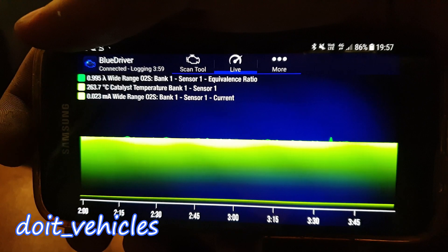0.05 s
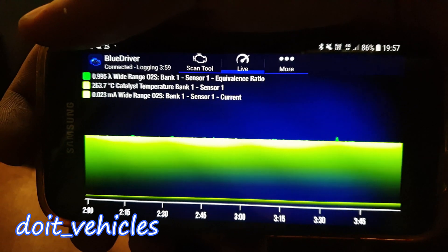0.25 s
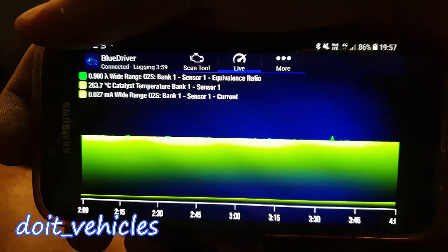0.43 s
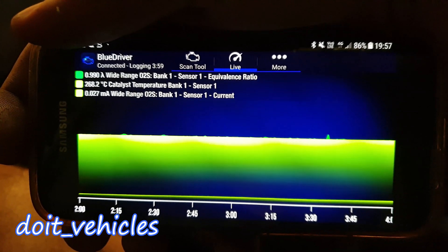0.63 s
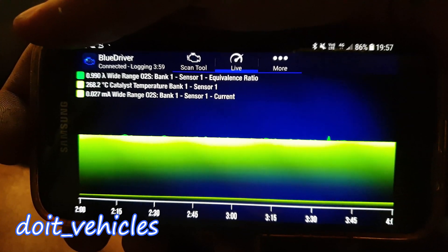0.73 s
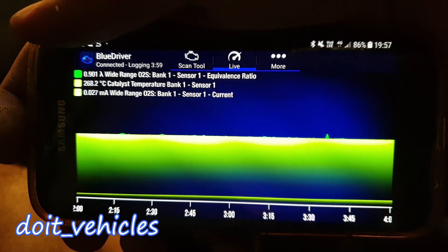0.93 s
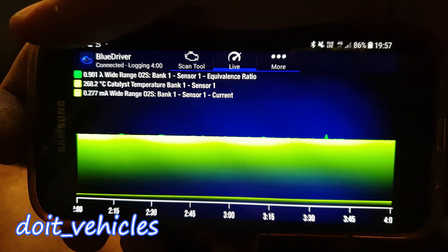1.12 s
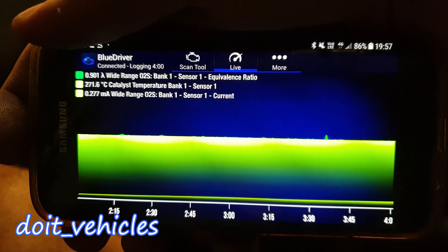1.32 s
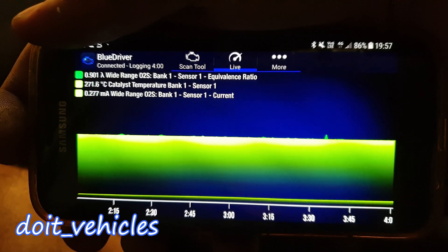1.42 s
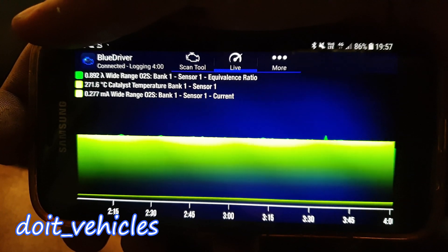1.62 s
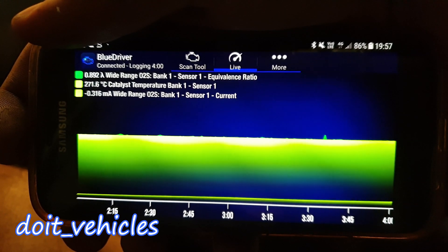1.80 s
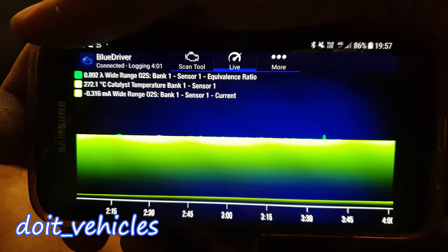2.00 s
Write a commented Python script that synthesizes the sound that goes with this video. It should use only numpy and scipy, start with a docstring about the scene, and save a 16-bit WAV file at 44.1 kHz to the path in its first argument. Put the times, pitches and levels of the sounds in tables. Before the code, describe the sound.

A four-cylinder car engine heard inside the closed cabin: a dry click and pedal scuff, a quick rev upward, a soft pedal knock, then a smooth fall to quiet idle, on a close mono microphone.

```python
"""We hear a four-cylinder engine from the driver's seat of a closed car: a blip of the accelerator
sweeps the firing tone up, then it sinks back to idle. Sines at multiples of the firing rate make the tone.
Around the microphone, resonant and coloured noise makes a muffled mechanical roar that follows the speed.
A dry splice click comes first; the pedal scuffs when pressed and knocks when let go,
from clicks ringing its modes and short bursts of noise."""
import sys
import numpy as np
from scipy import signal
from scipy.fft import rfft, irfft
from scipy.io import wavfile

SR = 44100
rng = np.random.default_rng(int(sys.argv[2]) if len(sys.argv) > 2 else 0)


def unload_wav(signal):
    """Save mono or channel-first audio to the path in sys.argv[1] as 16-bit WAV at rate SR, clipped to [-1, 1]."""
    wavfile.write(
        sys.argv[1],
        SR,
        np.round(np.clip(np.atleast_2d(signal).T, -1, 1) * 32767).astype(np.int16),
    )


N = 90449  # samples, about 2.05 s

# Engine speed and firing tone: (time [s], firing rate [Hz], level of the tone [dB],
# of its 2nd multiple [dB], of its 3rd [dB], of its 4th [dB])
ENGINE_SPEED = [(0.03, 43.55, -34.5, -42.5, -59, -52.5), (0.07, 46.3, -36, -41, -45, -46),
                (0.1, 49.6, -29.5, -42, -42, -71.5), (0.12, 50.4, -19, -39.5, -42, -46.5),
                (0.15, 55.9, -22, -34.5, -30, -45), (0.2, 61.9, -19, -42, -50, -49.5),
                (0.24, 69.75, -31, -30.5, -39.5, -57.5), (0.29, 76, -37.5, -45.5, -39.5, -52.5),
                (0.32, 80.8, -30, -38.5, -44, -63), (0.37, 86.23, -28.5, -39, -50, -45),
                (0.41, 90.9, -28, -46.5, -66.5, -55.5), (0.43, 90.5, -26, -41, -52, -69),
                (0.46, 93.2, -25, -54.5, -56.5, -51.5), (0.52, 96.54, -26, -46, -58, -64.5),
                (0.61, 94.87, -28.5, -51.5, -56, -63), (0.66, 94.4, -26.5, -47.5, -65.5, -55),
                (0.72, 94.4, -27, -53, -60, -64.5), (0.76, 93.3, -28, -56.5, -53.5, -75),
                (0.79, 92.7, -26.5, -50, -60, -45), (0.82, 92.4, -29.5, -45.5, -65, -80),
                (0.87, 89.8, -43, -45.5, -73, -63.5), (0.92, 87.24, -30, -48.5, -66.5, -69),
                (1.0, 83.7, -25.5, -35, -58, -67), (1.04, 83.6, -26.5, -31.5, -62.5, -50),
                (1.14, 80.75, -33, -41, -50, -58.5), (1.2, 78.05, -34, -38, -55.5, -69),
                (1.3, 72.9, -35.5, -50, -67, -69), (1.36, 68.45, -42, -43, -56, -76),
                (1.45, 64.8, -31.5, -63, -68, -70.5), (1.52, 60.75, -39, -40.5, -58, -68),
                (1.57, 58.1, -28.5, -54.5, -55, -74.5), (1.64, 54.32, -30.5, -56, -51.5, -61),
                (1.68, 52.47, -40, -54.5, -72, -78), (1.79, 45.48, -44, -54, -50, -56.5),
                (1.82, 44.26, -36, -43, -82, -65), (1.85, 43.55, -40, -63, -48, -50.5),
                (1.93, 43.42, -56.5, -49.5, -56, -55), (1.99, 42.87, -34, -39.5, -51, -62),
                (2.03, 42.72, -37, -40, -70, -69), (2.04, 42.86, -36, -34, -43, -64)]
WAVER_DB, WAVER_HZ = 0.8, 14  # spread and rate of the level wander

# Unevenness of the cylinders: (multiple of the firing rate [1], level against the roar's mids [dB])
UNEVEN_FIRING = [(.5, -0.5), (1.5, -6), (2.5, -19), (3.5, -15.5)]
UNEVEN_WAVER_DB, UNEVEN_WAVER_HZ = 3.5, 11

# Roar before pulsing: (time [s], level of the cabin boom [dB], of the mids [dB], of the upper mids [dB],
# of the presence band [dB], of the treble hiss [dB])
ROAR_LEVELS = [(0.02, -56, -66.5, -61, -74, -83.5), (0.04, -51, -47.5, -62.5, -72.5, -78.5),
               (0.16, -53, -45.5, -64.5, -82, -83.5), (0.24, -41.5, -48, -59.5, -79.5, -78),
               (0.31, -27, -45, -60, -72, -78), (0.39, -38.5, -47, -59, -69, -79),
               (0.46, -37, -46, -59, -70.5, -79.5), (0.56, -56, -47, -56, -69, -82.5),
               (0.72, -53, -46, -57.5, -69.5, -81.5), (0.88, -50.5, -48.5, -57.5, -69, -82),
               (1.04, -46.5, -48.5, -59, -73, -82), (1.25, -44, -51, -61, -74.5, -83.5),
               (1.43, -47.5, -53, -64, -77.5, -82.5), (1.59, -49.5, -54.5, -67.5, -82, -84.5),
               (1.7, -52.5, -55, -70.5, -84.5, -85), (1.81, -50.5, -55.5, -75, -90, -84.5),
               (1.92, -49, -54, -71.5, -87.5, -86), (2.02, -55, -54.5, -71, -92, -84.5)]
BOOM_HZ, BOOM_WIDTH_HZ = 57.8, 17
SECOND_BOOM_HZ, SECOND_BOOM_WIDTH_HZ, SECOND_BOOM_DB = 163.8, 31, -9  # dB against the first boom
MIDS_PULSE, CLATTER_PULSE = 0.25, 0.07  # depth of the pulsing with each firing, as a fraction
HISS_WAVER_DB, HISS_WAVER_HZ = 1.0, 8

# Noise shapes of the roar, low to high: (frequency [Hz], relative density [dB per Hz])
MIDS_SPECTRUM = [(21, -33.5), (36, -13.5), (49, -22.5), (70, -17), (113, -19), (169, -22), (232, -20),
                 (333, -19), (472, -20), (527, -16.5), (589, -20), (1000, -36), (1300, -68.5), (2200, -120)]
UPPER_SPECTRUM = [(530, -4.5), (900, -4.5), (959, -14.5), (1180, 1.5), (1250, -5), (1370, -3), (1870, -8),
                  (2100, -19), (2730, -42.5), (4620, -120)]
PRESENCE_SPECTRUM = [(1700, -34), (2100, 2.5), (2500, 3.5), (3000, -0.5), (3600, -6.5), (4500, -12),
                     (5200, -23), (6500, -42)]
HISS_SPECTRUM = [(3500, -21.5), (4800, -9), (5500, -6), (7000, -3), (9900, -7), (10500, -14), (13000, -18),
                 (16000, -16.5)]

# Trim panels singing faintly in the clatter:
# (frequency [Hz], level against the upper mids [dB], time to fall 60 dB [s])
TRIM_PANELS = [(993, -14, 0.3), (1068, -8, 0.11), (1152, -11.5, 0.13), (1329, -11.5, 0.046),
               (1540, -18.5, 0.087), (1570, -20, 0.11), (2136, -24.5, 0.097), (2316, -24, 0.13)]

SPLICE_S, SPLICE_DB, SPLICE_FADE_S = 0.0256, -29, 0.006  # start, height, time to fall to 1/e

# Pedal contacts: (time [s], level of the first touch's click [dB], scuff level [dB], scuff hold [s])
PEDAL_CONTACTS = [(0.031, -51.5, -58, .013), (0.3445, -38.5, -62, .012)]
# Ringing of the pedal: (frequency [Hz], level [dB], time to fall 60 dB [s])
PEDAL_RINGING = [(340, -7, .1), (442, 5, 0.077), (511, -2, 0.072), (631, -7, 0.079), (1052, -4.5, 0.021),
                 (1660, -15, .02), (2150, -12.5, .02)]
MAIN_HIT_DELAY_S, MAIN_HIT_DB = 0.0062, 2.5  # the main hit follows a lighter first touch
CONTACT_HZ = 2300  # low-pass corner of the soft contact
# Noise shape of the scuffing shoe: (frequency [Hz], relative density [dB per Hz])
SCUFF_SPECTRUM = [(500, -24), (900, -7.5), (1500, 1.5), (3000, -11), (5000, -12.5), (9500, -22),
                  (11000, -26), (16000, -35.5)]
SCUFF_FADE_S = 0.007  # time to fall to 1/e after the hold

BASS_CUT_HZ, TOP_CUT_HZ = 33, 16300  # microphone's high-pass corner; stopband edge at the top


def from_db(db):
    """Convert decibels to gain."""
    return 10 ** (np.asarray(db) / 20)


def rms_one(x):
    """Scale a signal to unit rms."""
    return x / np.sqrt(np.mean(x ** 2) + 1e-20)


def in_time(rows):
    """Join table columns by straight lines over time, one value a sample."""
    times, *columns = np.transpose(rows)
    return [np.interp(np.arange(N) / SR, times, column) for column in columns]


def drift(rate_hz):
    """Wander slowly with spread 1: noise through two equal low-pass poles at the given rate."""
    step = 40  # samples between the slow values
    pole = np.exp(-2 * np.pi * rate_hz * step / SR)
    noise = rng.standard_normal(N // step + 2002)
    slow = signal.lfilter([1], [1, -2 * pole, pole ** 2], noise)[2000:]  # drop the filter's start
    return np.interp(np.arange(N) / step, np.arange(len(slow)), rms_one(slow))


def coloured(spectrum):
    """Shape white noise to a spectrum drawn over log frequency, at unit rms."""
    hz, db = np.transpose(spectrum)
    grid_hz = np.maximum(np.arange(N // 2 + 1) * SR / N, 1)
    gain = from_db(np.interp(np.log(grid_hz), np.log(hz), db, left=-200, right=-200))
    return rms_one(irfft(rfft(rng.standard_normal(N)) * gain, N))


def ring(x, hz, t60):
    """Excite one damped resonance: a unit click sets a sine of starting height 1 ringing."""
    radius = from_db(-60 / (t60 * SR))
    angle = 2 * np.pi * hz / SR
    feedback = [1, -2 * radius * np.cos(angle), radius ** 2]
    return signal.lfilter([0, np.sin(angle)], feedback, x + 1e-18)


def tone(phase, db):
    """Sound a sine of the given rms level, starting at a random phase."""
    return np.sqrt(2) * from_db(db) * np.sin(phase + rng.uniform(0, 2 * np.pi))


def firing(phase, levels_db, mids_db):
    """Sum the firing tone and its multiples, with wavering lines of uneven cylinders at half multiples."""
    even, uneven = 0, 0
    for multiple, level_db in enumerate(levels_db, start=1):
        even += tone(multiple * phase, level_db + WAVER_DB * drift(WAVER_HZ))
    for multiple, offset_db in UNEVEN_FIRING:
        waver_db = UNEVEN_WAVER_DB * drift(UNEVEN_WAVER_HZ)
        uneven += tone(multiple * phase, mids_db + offset_db + waver_db)
    return even + uneven


def boom(hz, width_hz):
    """Pass noise twice through one air resonance of the cabin."""
    t60 = np.log(1000) / (np.pi * width_hz)
    once = ring(rng.standard_normal(N), hz, t60)
    return rms_one(ring(once, hz, t60))


def trim_panels():
    """Shake the trim panels: one noise drives all their damped resonances."""
    shake = rng.standard_normal(N)
    return sum(from_db(db) * rms_one(ring(shake, hz, t60)) for hz, db, t60 in TRIM_PANELS)


def roar(phase, boom_db, mids_db, upper_db, presence_db, hiss_db):
    """Mix cabin boom, block and valve-train noise pulsing with each firing, and a thin hiss."""
    second_boom = from_db(SECOND_BOOM_DB) * boom(SECOND_BOOM_HZ, SECOND_BOOM_WIDTH_HZ)
    cabin = from_db(boom_db) * (boom(BOOM_HZ, BOOM_WIDTH_HZ) + second_boom)

    beat = np.cos(phase)  # one swing per firing
    mids = from_db(mids_db) * (1 + MIDS_PULSE * beat) * coloured(MIDS_SPECTRUM)

    upper = from_db(upper_db) * (coloured(UPPER_SPECTRUM) + trim_panels())
    presence = from_db(presence_db) * coloured(PRESENCE_SPECTRUM)
    clatter = (1 + CLATTER_PULSE * beat) * (upper + presence)

    hiss_level_db = hiss_db + HISS_WAVER_DB * drift(HISS_WAVER_HZ)
    hiss = from_db(hiss_level_db) * coloured(HISS_SPECTRUM)
    return cabin + mids + clatter + hiss


def splice_click():
    """Step the waveform at a splice, then let it fade within milliseconds."""
    since = np.arange(N) / SR - SPLICE_S
    return from_db(SPLICE_DB) * (since > 0) * np.exp(-np.maximum(since, 0) / SPLICE_FADE_S)


def pedal():
    """Strike the pedal's modes with a soft double thud and scuff the shoe briefly at each contact."""
    t = np.arange(N) / SR
    clicks, scuff_gain = np.zeros(N), np.zeros(N)
    for start, thud_db, scuff_db, hold in PEDAL_CONTACTS:
        clicks[int(start * SR)] = from_db(thud_db)
        clicks[int((start + MAIN_HIT_DELAY_S) * SR)] = from_db(thud_db + MAIN_HIT_DB)
        fade = np.exp(-np.maximum(t - start - hold, 0) / SCUFF_FADE_S)
        scuff_gain += from_db(scuff_db) * (t > start) * fade
    soften = signal.butter(3, CONTACT_HZ, fs=SR, output="sos")
    soft_clicks = signal.sosfilt(soften, clicks + 1e-18)
    thuds = sum(from_db(db) * ring(soft_clicks, hz, t60) for hz, db, t60 in PEDAL_RINGING)
    return thuds + scuff_gain * coloured(SCUFF_SPECTRUM)


def scene():
    """Mix engine tones, roar and pedal, as heard at the driver's seat, with the splice click."""
    rate_hz, *levels_db = in_time(ENGINE_SPEED)
    bands_db = in_time(ROAR_LEVELS)
    mids_db = bands_db[1]
    phase = 2 * np.pi * np.cumsum(rate_hz) / SR
    engine = firing(phase, levels_db, mids_db) + roar(phase, *bands_db)
    mono = engine + splice_click() + pedal()
    return mono[None]  # one channel


def record(dry):
    """Lose the deepest bass in the microphone and cut the top steeply."""
    bass_cut = signal.butter(4, BASS_CUT_HZ, "high", fs=SR, output="sos")
    top_cut = signal.cheby2(16, 60, TOP_CUT_HZ, fs=SR, output="sos")  # 60 dB down in the stopband
    return signal.sosfilt(top_cut, signal.sosfilt(bass_cut, dry))


dry = scene()
out = record(dry)
unload_wav(out)
```